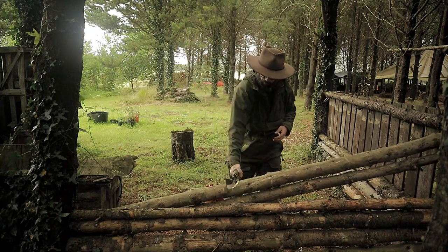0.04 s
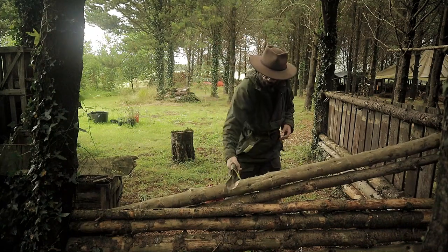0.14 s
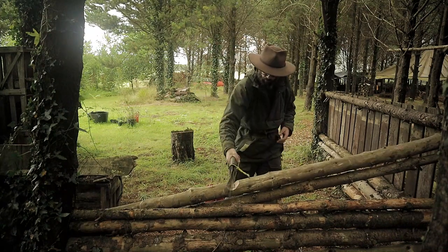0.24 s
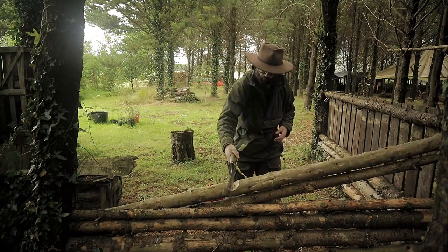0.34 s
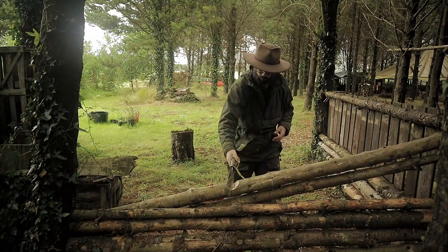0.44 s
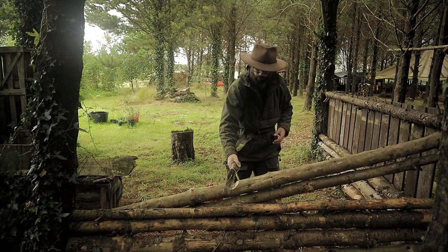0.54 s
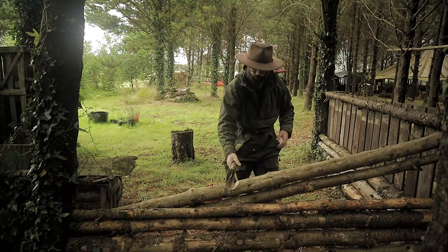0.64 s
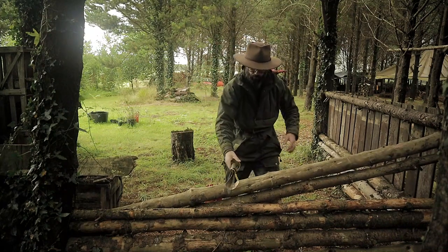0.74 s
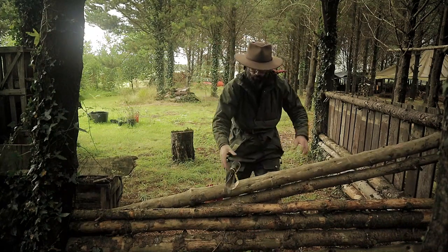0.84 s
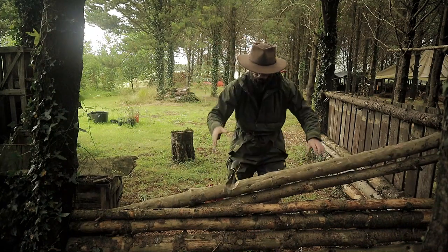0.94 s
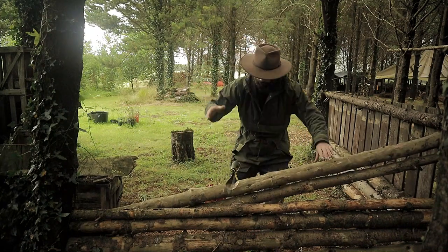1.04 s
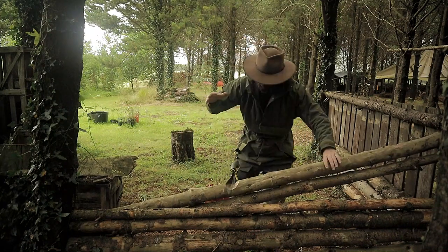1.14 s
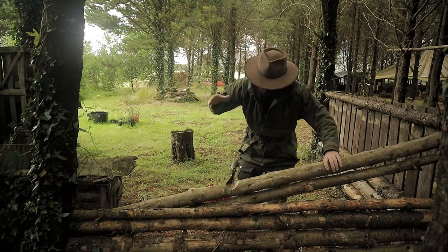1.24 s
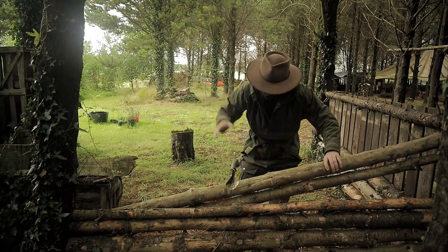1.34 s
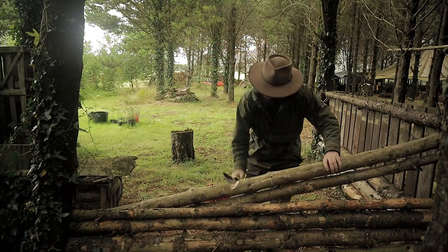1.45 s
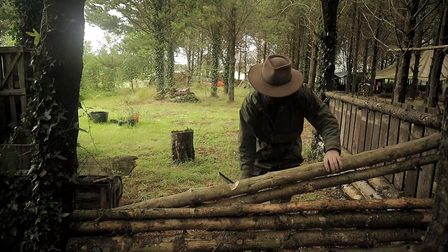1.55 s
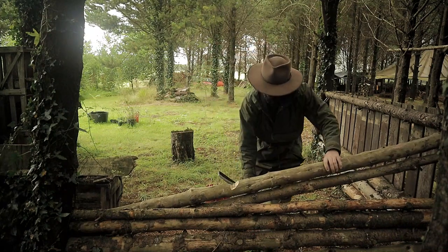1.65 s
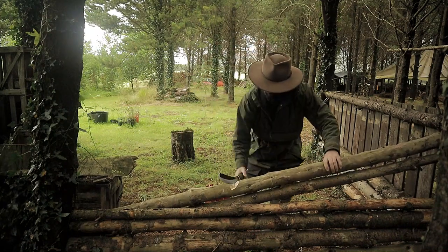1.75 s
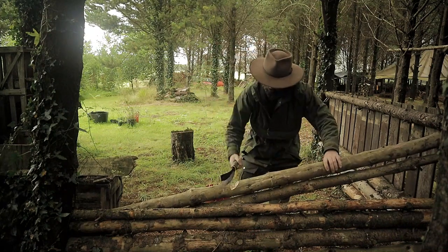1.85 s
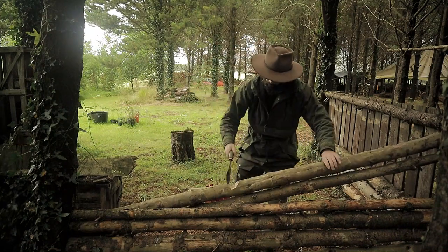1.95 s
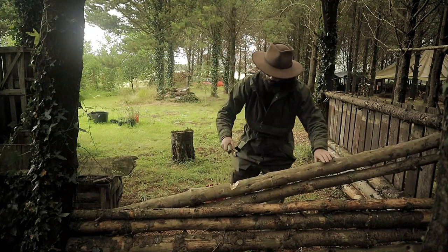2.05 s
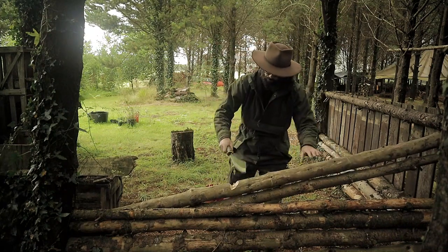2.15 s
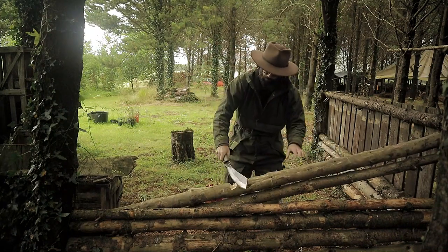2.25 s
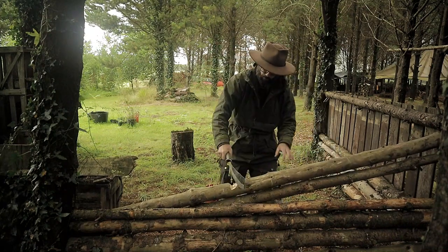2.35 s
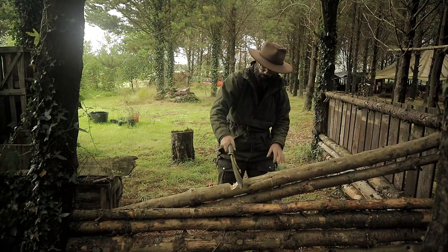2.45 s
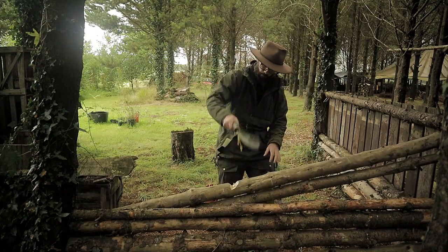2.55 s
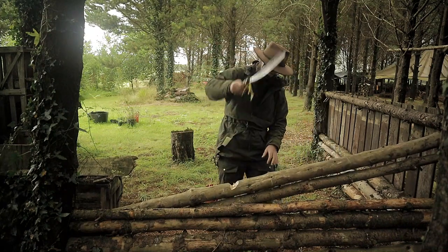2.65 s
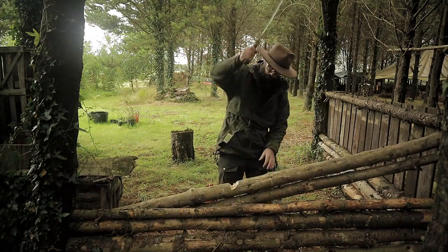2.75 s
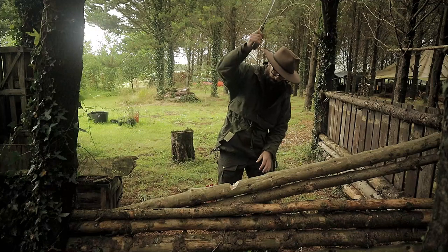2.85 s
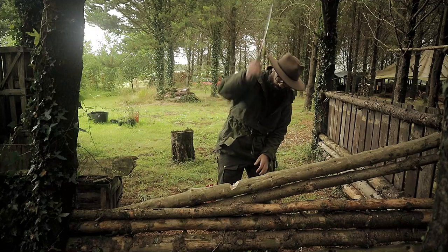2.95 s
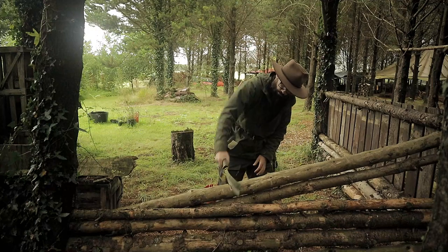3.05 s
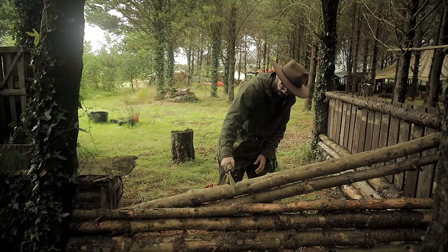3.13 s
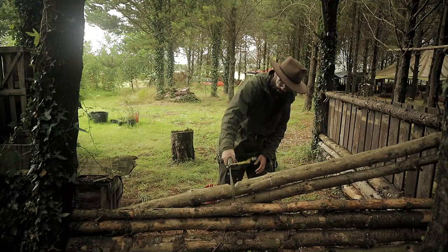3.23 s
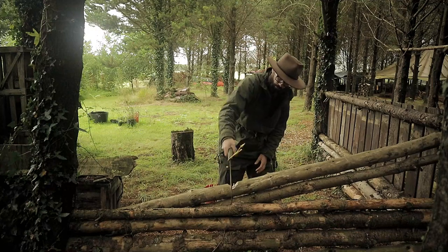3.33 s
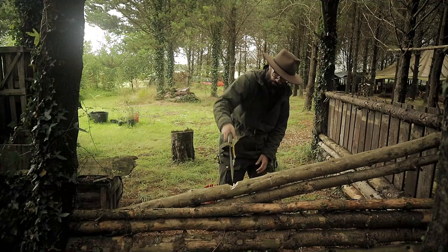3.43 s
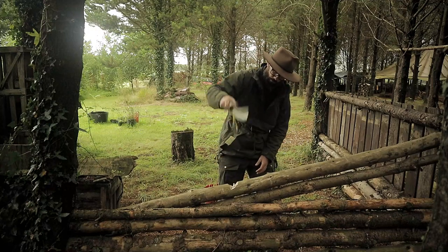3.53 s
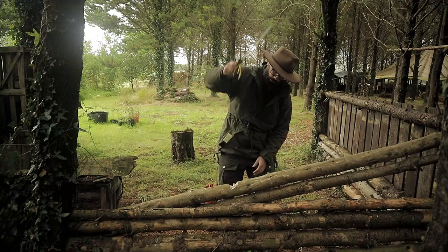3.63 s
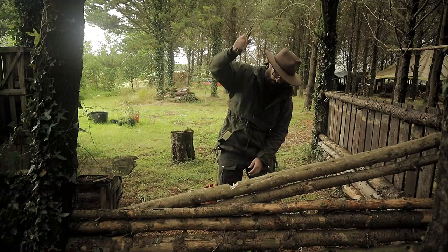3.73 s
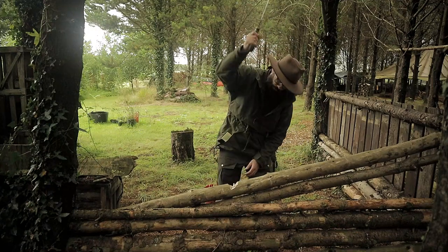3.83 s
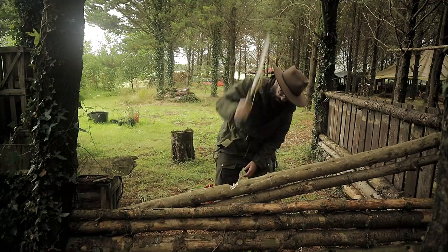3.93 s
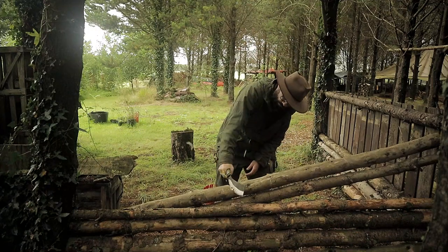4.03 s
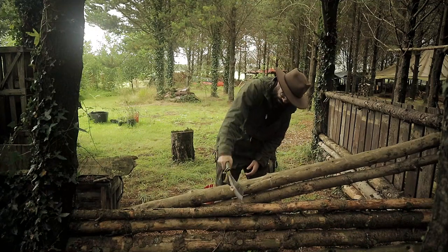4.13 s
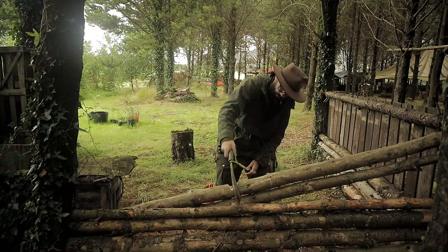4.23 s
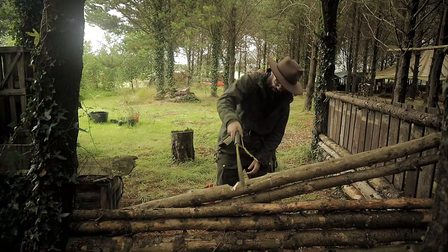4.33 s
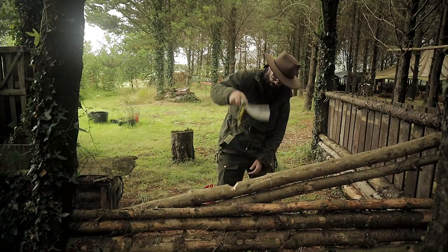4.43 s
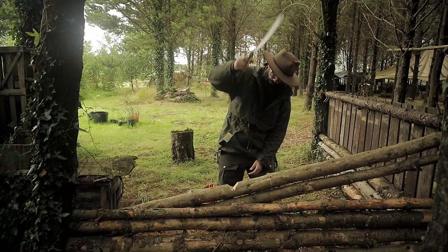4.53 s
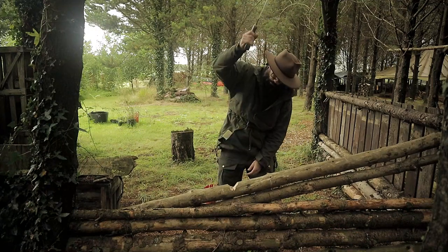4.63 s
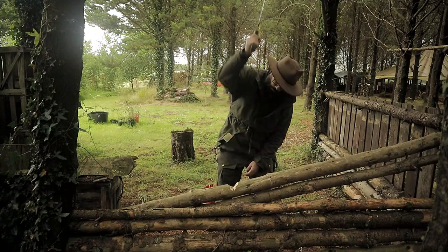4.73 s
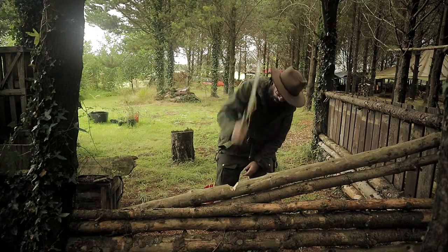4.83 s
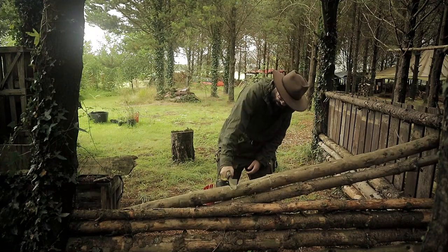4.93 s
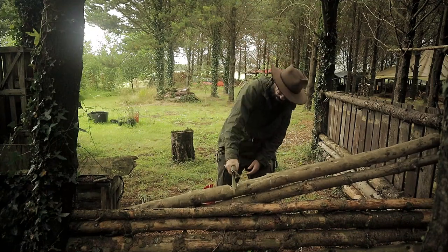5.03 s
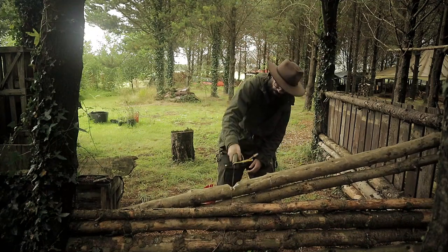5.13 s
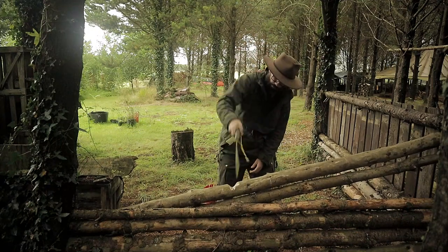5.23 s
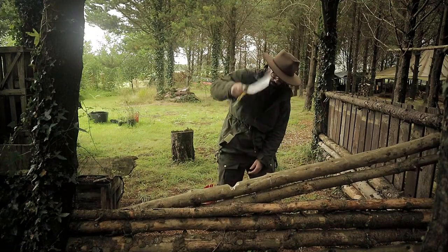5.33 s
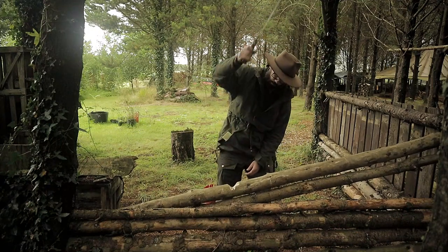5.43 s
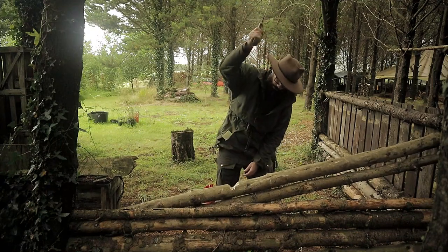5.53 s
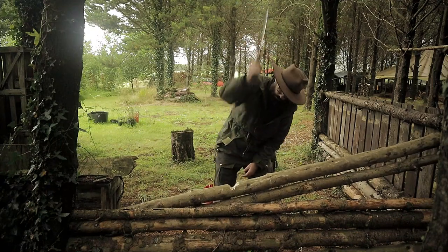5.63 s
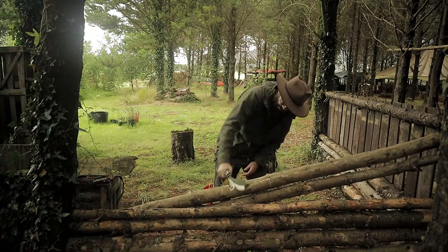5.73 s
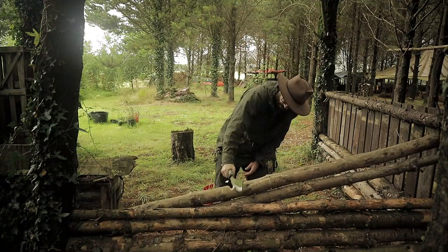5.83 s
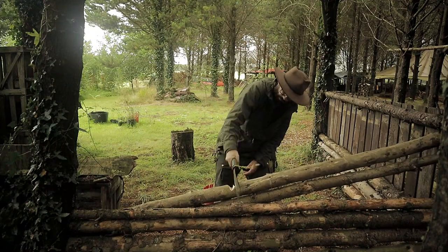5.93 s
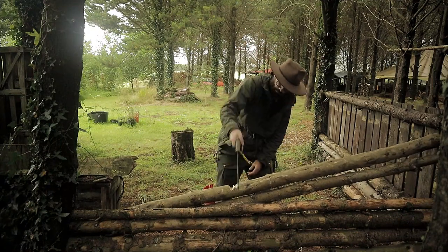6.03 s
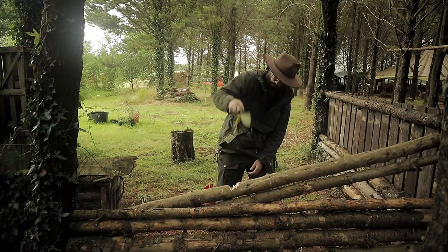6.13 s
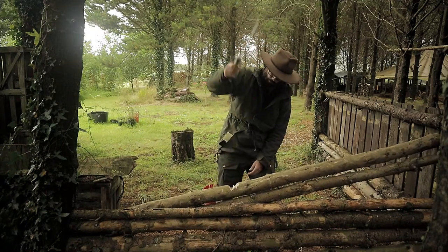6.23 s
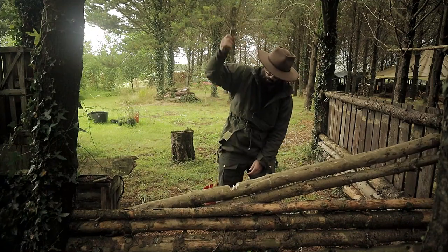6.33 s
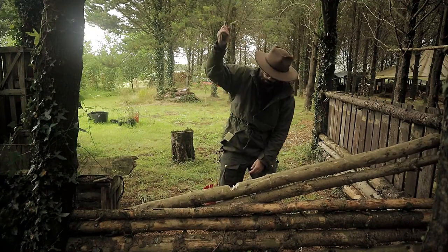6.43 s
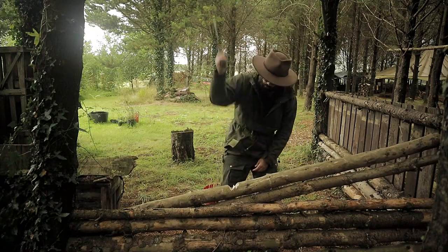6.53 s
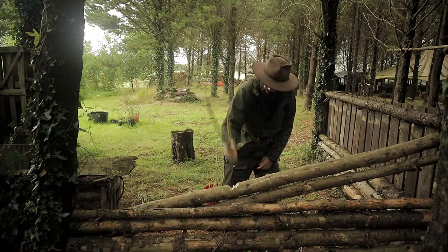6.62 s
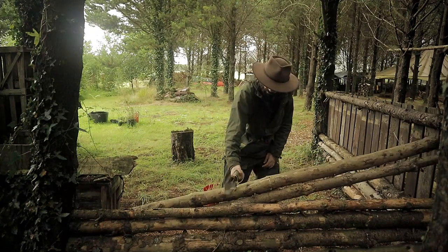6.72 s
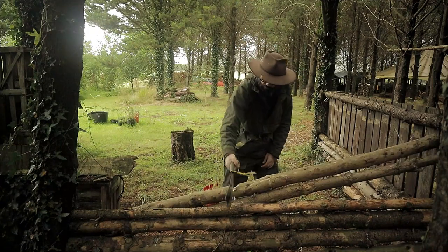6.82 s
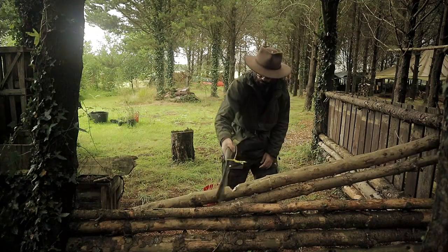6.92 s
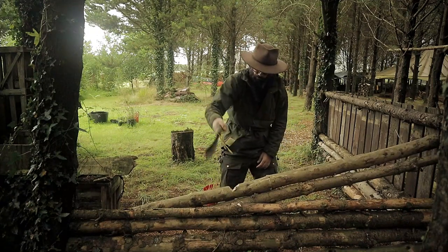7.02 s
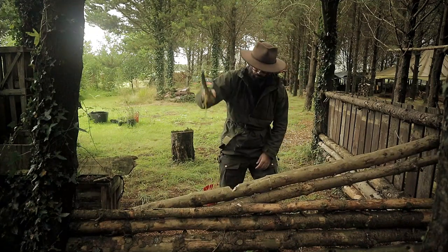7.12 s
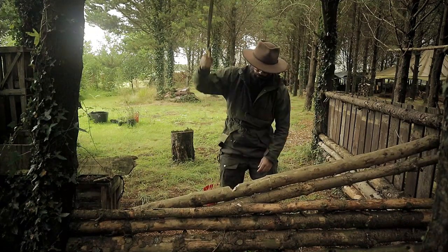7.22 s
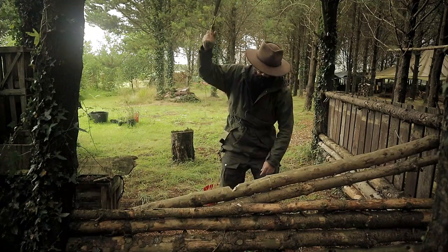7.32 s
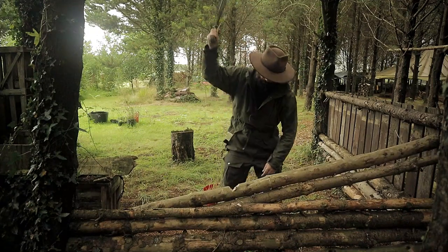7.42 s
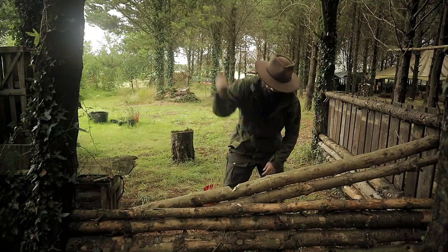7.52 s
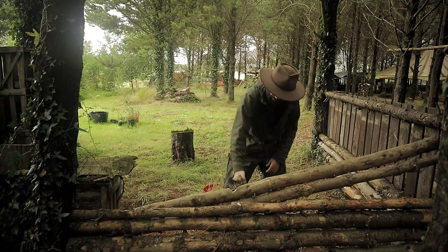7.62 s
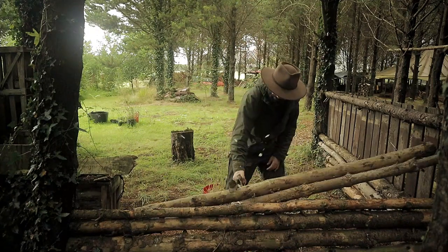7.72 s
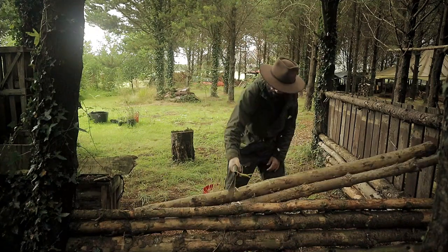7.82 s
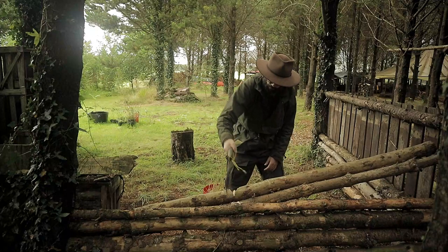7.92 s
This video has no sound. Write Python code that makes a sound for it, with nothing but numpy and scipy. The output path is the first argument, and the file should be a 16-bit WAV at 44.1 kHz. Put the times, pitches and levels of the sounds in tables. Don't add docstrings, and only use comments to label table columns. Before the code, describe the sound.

Outdoors among trees, hard single chops bite into a resonant pole, with falling chips, a brief blade scrape and faint birds between.

```python
import sys
import numpy as np
from scipy import signal
from scipy.fft import rfft, irfft
from scipy.io import wavfile
from scipy.ndimage import uniform_filter1d

SR = 44100
rng = np.random.default_rng(int(sys.argv[2]) if len(sys.argv) > 2 else 0)


def how_loud(loudness_db):
    steps = np.asarray(loudness_db, float) / 20
    return 10 ** steps


def unload_wav(signal):
    wavfile.write(
        sys.argv[1],
        SR,
        np.round(np.clip(np.atleast_2d(signal).T, -1, 1) * 32767).astype(np.int16),
    )


N = 351477

BLOW_S = [0.1154, 3.1507, 4.0930, 4.9755, 5.8300, 6.7497, 7.7052]
# fibre crackle in dB, crackle length in ms, blade ring in dB,
# time the edge sinks before the pole takes the load in ms, woody tail in dB.
BITES = [(-7, 1.3, -34.5, 0.017, 3), (-2.5, 1.1, -30, 0.37, -1), (-3, 2.3, -30.5, 1.7, -5.5),
         (2, 1.6, -19.5, 0.75, 0.5), (-3, 3.9, -18.5, 1.3, -11.5), (-10, 2.5, -33.5, .05, 4),
         (0, 0.79, -23.5, 0.33, 3)]
# frequency in Hz, level in dB, t60 in seconds.
POLE = [(165, -23, 0.36), (282, -27.5, 0.012), (338.3, -14, .14), (435, -16, 0.032), (450, -14.5, 0.14),
        (511, -17, 0.056), (489, -21.5, 0.34), (657, -14, 0.036), (708, -9.5, 0.12), (780, -17.5, 0.12),
        (840, -10.5, 0.06), (848, -13.5, 0.033), (972, -8, 0.1), (1075, -14.5, 0.067), (1208, -3.5, 0.044),
        (1454, -10.5, 0.022), (1830, -15, 0.025), (2126, -5.5, 0.024), (2560, -7.5, 0.019),
        (2886, -14.5, 0.019), (3600, -11, 0.017)]
# frequency in Hz, density in dB per Hz.
CRACKLE = [(710, -35), (1200, 4.5), (1760, -3), (4500, -1.5), (5250, -3.5), (6120, -18), (7210, -5),
           (9170, -9.5), (13700, -19), (16400, -31)]


def rms_one(x):
    return x / np.sqrt(np.mean(x ** 2) + 1e-20)


def at_hz(points, hz, column=1):
    points = np.array(points)
    return np.interp(np.log(hz), np.log(points[:, 0]), points[:, column])


def band(x, low_hz, high_hz, order=2):
    sos = signal.butter(order, [low_hz, min(high_hz, .45 * SR)], "band", fs=SR, output="sos")
    return signal.sosfilt(sos, x)


def colour(x, points):
    size = 4096
    hz = np.maximum(np.fft.rfftfreq(size, 1 / SR), 1)
    cepstrum = irfft(np.log(how_loud(at_hz(points, hz))))
    cepstrum[1:size // 2] *= 2
    cepstrum[size // 2 + 1:] = 0
    response = irfft(np.exp(rfft(cepstrum)))[:size // 2]
    return signal.fftconvolve(x, response / np.sqrt(np.sum(response ** 2)))[:len(x)]


def ring(force, hz, t60):
    radius = how_loud(-60 / (max(t60, .003) * SR))
    angle = 2 * np.pi * hz / SR
    return signal.lfilter([0, np.sin(angle)], [1, -2 * radius * np.cos(angle), radius ** 2], force + 1e-18)


def add(out, piece, s):
    i = round(s * SR)
    piece = piece[max(-i, 0):N - i]
    out[max(i, 0):max(i, 0) + len(piece)] += piece


def pole_ring(force, shares_db, damping):
    out = 0
    for k, (hz, level_db, t60) in enumerate(POLE):
        hz = hz * (1 + .011 * np.clip(rng.standard_normal(), -1.5, 1.5))
        late = np.roll(force, round(1.3 * SR / hz))
        gain = how_loud(level_db + shares_db[k])
        out = out + ring(late * gain * (-1) ** k, hz, t60 / damping)
    return out


def burst(length_ms, size):
    t = np.arange(size) / SR
    snaps = rng.standard_normal(size) * how_loud(2.2 * rng.standard_normal(size))
    decay = np.exp(-(t * 1000 / max(length_ms, .3)) ** 1.3)
    return rms_one(snaps) * np.minimum(t / 0.00018, 1) * decay


def blows():
    # pole level in dB, brightness in dB per octave,
    # side of the notch from -1 to 1, air push in dB.
    pole_blows = [(2, 2.5, -.55, 0.5), (1.5, 3, -0.075, 1), (0.4, -0.5, -0.56, -3.5), (1.5, 1.5, 1.0, -2),
                  (0, 2.5, 0.94, -6), (1, 2.5, -0.21, 0), (-1.23, 0, -.45, 1.5)]
    strike_hz = [300, 460, 720, 860, 970, 1210]
    # gain in dB near the lowest strike frequency, per blow.
    low_modes_db = [1.5, 1, -2.5, 1.5, -12.5, 2.5, 0]
    strikes = [(0.71, 9, 11, 4.5, -1.5), (-0.66, 2, -7.5, -0.5, 0.5), (-2.3, 0, 0.5, 0, -2),
               (2, 0.5, 2.5, -0.5, -3.5), (-1, 4, 3.5, 1.5, -8), (-1, -2, 0.5, -1, -0.5),
               (1.59, -1, 8.5, 0.5, -1)]
    # level in dB, frequency in Hz (the band lies 1.1 to 1.27 times higher), upper
    # modes in dB, damping of the wedged pole as a factor, steel left ringing in dB.
    splits = [(-13, 12000, 1.5, 1.1, -2.5), (-12.5, 6900, -3.5, 1.05, -4.5), (2, 7600, -6.5, 1.5, -4),
              (3, 8000, -0.5, 0.83, -7.5), (3.5, 7500, -2.5, 1.05, -3), (-8, 9300, -3.5, 1, -3),
              (1, 8100, -3, 1.1, -2.5)]
    # frequency in Hz, gain on the far side in dB.
    far_side = [(340, 1), (460, -8.5), (630, 2.5), (720, -3), (860, -6.5), (960, 5), (1200, -10.5),
                (1430, 2)]
    # frequency in Hz, level in dB, t60 in seconds.
    blade = [(4320, -1, 0.041), (5396, -3, 0.039), (5120, 3.5, 0.036)]
    out, size = np.zeros(N), SR // 2
    t, pole_hz = np.arange(size) / SR, np.array(POLE)[:, 0]
    contact = np.exp(-((t - .0004) / 0.000084) ** 2)
    for s, blow, bite, strike_db, low_db, cleft in zip(
            BLOW_S, pole_blows, BITES, strikes, low_modes_db, splits):
        pole_db, bright_db, side, push_db = blow
        crack_db, ms, blade_db, sink_ms, _ = bite
        split_db, split_hz, upper_db, damping, steel_db = cleft
        landing = np.transpose([[*strike_hz, 1450], [low_db, *strike_db, upper_db]])
        shares_db = pole_db + bright_db * np.log2(pole_hz / 1000) + side * at_hz(far_side, pole_hz)
        shares_db = shares_db + at_hz(landing, pole_hz)
        snaps = burst(ms, size)
        force = contact / contact.sum() + 0.11 * snaps
        push = np.sin(2 * np.pi * 450 * t) * np.exp(-(t / 0.0023) ** 2) * how_loud(push_db + 1.0)
        steel = 0
        for hz, level_db, t60 in blade:
            steel = steel + ring(snaps * .1 * how_loud(level_db + blade_db + steel_db), hz, t60)
        split = band(burst(ms * 0.37, size), split_hz * 1.1, split_hz / 0.79, order=1) * how_loud(split_db)
        add(out, how_loud(crack_db) * colour(snaps, CRACKLE) + split + steel, s)
        add(out, push + 0.48 * pole_ring(force, shares_db, damping), s + max(sink_ms, 0) / 1000)
    return out


def grain(size):
    drift = uniform_filter1d(uniform_filter1d(rng.standard_normal(size), size=150), size=150)
    return how_loud(1.6 * rms_one(drift) - 0.9)


def scatter(levels_db):
    echo_hz = [250, 600, 1200, 2600, 5300, 10000]
    # frequency in Hz, early over late part in dB, t60 in seconds.
    woods = [(200.4, 7.5, 0.31), (360, 6.5, 0.43), (700, 10, 0.33), (1248.6, 12.5, 0.52),
             (2500, 12.5, 0.51), (5000, 8.5, 0.23), (9000, 9, 0.49), (15000, 9, 0.35)]
    t = np.arange(SR * 3 // 4) / SR
    edges_hz = 140 * 2 ** np.arange(0, 7.1, .5)
    white, out = rng.standard_normal((2, len(t))), 0
    for k, (low, high) in enumerate(zip(edges_hz, edges_hz[1:])):
        hz = np.sqrt(low * high)
        t60 = max(at_hz(woods, hz, column=2), .05)
        early = how_loud(at_hz(woods, hz) - 60 * t / (t60 * 0.17))
        air_loss_db = 6.7 * max(np.log2(hz / 9000), 0)
        level = how_loud(at_hz(np.transpose([echo_hz, levels_db]), hz) - air_loss_db)
        patches = how_loud(1.5 * rms_one(uniform_filter1d(rng.standard_normal(len(t)), size=400)))
        far = how_loud(-9 - 9.8 * np.log2(hz / 1500) ** 2 - 60 * t / 1.35)
        out = out + rms_one(band(white[k % 2], low, high)) * patches * level * (how_loud(-60 * t / t60) + early + far)
    out = out * grain(len(t))
    return out * (1 - np.exp(-(t / .003) ** 2)) * np.cos(np.pi * t / 1.5)


def tails():
    tail_db = [-39, -34, -45.5, -47, -43, -53]
    # dB per dB of woody tail, at an echo band.
    follows_wood = [-0.91, 0.96, 0.46, -0.024, -0.68, -0.47]
    # dB per dB of blade ring, at an echo band.
    follows_blade = [0.12, 0.01, 0.01, 0.26, 0.72, .48]
    # start in seconds, centre in Hz, width in Hz, level in dB, t60 in seconds.
    blooms = [(0.117, 1290, 491, -37.5, 0.56), (.116, 468, 30.55, -45, 0.71),
              (3.151, 380, 30.16, -46.5, 0.86), (7.705, 466, 28, -42, 0.67), (.116, 2683, 607, -46.5, 0.75),
              (3.15, 1300, 486, -44.5, 0.24), (4.095, 5730, 600, -46, 0.5), (4.093, 7350, 700, -50, 0.5),
              (4.095, 2260, 403, -45, 0.37), (4.095, 3850, 400, -54, 0.4), (4.095, 1000, 597, -52, 0.89),
              (4.975, 3200, 2997, -53.5, 0.83), (4.977, 4000, 600, -45.5, .7),
              (4.977, 6950, 700, -54, 0.81), (4.977, 5400, 1200, -47, 0.59), (4.977, 1800, 300, -52, .6),
              (4.977, 700, 347.6, -37.5, 0.32), (4.977, 8700, 2000, -50, 0.49),
              (3.152, 2960, 406.4, -50, 0.58), (3.152, 1930, 296.7, -54, 0.43),
              (5.832, 5650, 500, -41.5, 0.52), (5.833, 5100, 500, -42, 0.55),
              (5.832, 8460, 2500, -50.5, 0.36), (5.832, 653.5, 350, -40.5, .25),
              (5.832, 95.75, 50.2, -41.5, 0.43), (6.76, 4250, 770, -53.5, .7),
              (6.76, 6300, 1400, -55.5, 0.72), (.117, 5600, 4400, -52, .5), (3.152, 5100, 4000, -52, 0.55),
              (6.76, 2275, 460, -55, 0.63), (7.706, 2300, 540, -48, 0.41),
              (7.706, 10000, 4000, -56.5, 0.74), (7.705, 6300, 900, -54.5, 0.71),
              (4.099, 160, 60, -38.5, 0.31), (3.151, 718.6, 118.5, -43.5, 0.43),
              (.116, 714, 152.4, -46, 0.78), (4.974, 1020, 122.2, -36, 0.26),
              (5.832, 980, 119.7, -42.5, 0.38), (6.75, 1137, 496, -40.5, 0.91),
              (7.704, 4160, 1500, -51, 0.94)]
    out, t = np.zeros(N), np.arange(SR * 3 // 4) / SR
    for s, (_, _, blade_db, _, wood_db) in zip(BLOW_S, BITES):
        levels_db = np.array(tail_db) + wood_db * np.array(follows_wood)
        levels_db = levels_db + (blade_db + 23) * np.array(follows_blade)
        add(out, scatter(levels_db), s)
    for s, hz, width_hz, db, t60 in blooms:
        bloom = rms_one(band(rng.standard_normal(len(t)), hz - width_hz / 2, hz + width_hz / 2))
        decay = how_loud(db - 60 * t / max(t60, .1)) * np.minimum(t / 0.0054, 1)
        add(out, bloom * grain(len(t)) * decay, s)
    return out


def swishes():
    # centre in Hz, level in dB.
    swish_bands = [(700, -64.5), (696, -68), (430, -62.5), (900, -65.5), (800, -66), (895, -67.5),
                   (690, -65)]
    out, t = np.zeros(N), np.arange(SR // 2) / SR
    for s, (hz, db) in zip(BLOW_S, swish_bands):
        air = rms_one(band(rng.standard_normal(len(t)), hz * .5, hz * 2))
        swell = 2.6 * np.exp(-(t[::-1] / .06) ** 1.5)
        add(out, how_loud(db) * air * swell, s - len(t) / SR)
    return out


def shakes():
    # start in seconds, loose logs in dB, ground thud in dB, slow sway in dB, stand ring in dB.
    pile_shakes = [
        (0.118, -40, -39.5, -55, -49),
        (0.549, -80, -51.5, -77, -60),
        (1.529, -65, -37.5, -63, -58),
        (2.32, -60, -54.5, -67.5, -65.5),
        (3.149, -35, -47.5, -55.5, -54),
        (4.093, -33.5, -38.5, -57, -51),
        (4.9766, -27.5, -41, -60, -54),
        (5.83, -30, -38, -61, -55),
        (6.7498, -26.5, -41, -66.5, -62),
        (7.705, -30.5, -41, -66.5, -60),
    ]
    sway_hz, sway_peak_s, stand_hz = 37.6, .38, 64.9
    out, t = np.zeros(N), np.arange(SR * 3 // 2) / SR
    for s, logs_db, thud_db, sway_db, stand_db in pile_shakes:
        knock = rms_one(band(rng.standard_normal(len(t)), 49, 190))
        knock = how_loud(logs_db) * knock * (1 - np.exp(-t / 0.0033)) * np.exp(-t / .075)
        thud = rms_one(band(rng.standard_normal(len(t)), 28, 140))
        thud = thud * np.minimum(t / 0.051, 1) * how_loud(thud_db - 60 * t / 0.65)
        swell = (t / sway_peak_s * np.exp(1 - t / sway_peak_s)) ** 2
        sway = how_loud(sway_db) * swell * np.sin(2 * np.pi * sway_hz * t)
        stand = how_loud(stand_db + 3 - 60 * t / 2.2) * np.minimum(t / .08, 1) * np.sin(2 * np.pi * stand_hz * t)
        add(out, (knock + thud + sway + stand) * np.cos(np.pi * t / 3), s)
    return out


def light_contacts():
    # start in seconds, peak in dB, centre in Hz.
    chip_falls = [(0.564, -50.5, 2865), (0.6303, -51, 4600), (0.6477, -55, 2800), (0.9544, -51, 1857),
                  (3.27, -39, 2990), (3.598, -39.5, 2080), (4.4292, -51, 2940), (4.4546, -48.5, 1797),
                  (4.5065, -52, 3470), (4.5048, -50.5, 8340), (4.874, -56, 5000), (5.069, -45, 2100),
                  (5.229, -52.5, 2500), (4.6138, -43, 2800), (4.6485, -54, 4883), (4.6658, -45.5, 4730),
                  (5.4165, -44.5, 2530), (5.5314, -42.5, 1980), (5.5522, -52, 3920), (6.0906, -52.5, 2560),
                  (6.1495, -59.5, 4396), (6.2957, -57, 3110), (6.4757, -55.5, 2400), (6.5954, -48.5, 2100),
                  (6.6937, -46, 1100), (6.796, -45, 2270), (7.1961, -57, 4700), (7.2144, -52.5, 4680),
                  (7.257, -49, 4700), (7.2664, -47, 4796), (7.5611, -52, 2570), (7.799, -49, 13000),
                  (7.877, -58, 11000), (7.893, -56.5, 11050)]
    # start in seconds, peak in dB, centre in Hz, share into the pole in dB.
    knock_backs = [(0.1916, -34.5, 2550, 4), (0.2118, -30, 1800, 4), (0.4687, -52.5, 3600, 6),
                   (3.2264, -36, 2106, 1), (5.0223, -22.5, 1900, 8), (6.8218, -31, 2274, -2),
                   (7.2492, -46.5, 3600, 4), (7.7607, -25.5, 2900, 8), (7.78, -36.5, 5000, 4.5),
                   (7.786, -28.5, 2300, 8.5)]
    # start in seconds, peak in dB, centre in Hz,
    # length in ms, share into the pole in dB.
    blade_taps = [(1.4945, -39.5, 1290, 4.5, 3.5), (1.503, -39, 4450, 4.4, 10),
                  (1.514, -48, 6020, 4.9, -16), (1.523, -42, 3000, 9.9, -15), (1.528, -27, 7750, 6.3, 4),
                  (1.532, -18, 3250, 4.6, -17), (1.545, -43, 3000, 13, -16), (1.5903, -45, 4000, 4.7, -11),
                  (1.599, -48, 6010, 5.3, -15), (1.61, -45, 1000, 14, 4), (1.642, -39.5, 1110, 1.6, 5),
                  (1.661, -52, 4004, 1.7, 3), (2.312, -37, 4300, 5.1, 8), (2.315, -70, 7600, 2.8, 7),
                  (2.320, -31, 1850, 0.74, 4)]
    # frequency in Hz, gain in dB.
    hand = [(300, 6), (460, -5.5), (700, 0), (950, 0.5), (1220, -3)]
    out, size, chip_ms = np.zeros(N), SR // 5, 2.8
    chips = [(s, db, hz, chip_ms, -9) for s, db, hz in chip_falls]
    knocks = [(s, db, hz, chip_ms, pole_db) for s, db, hz, pole_db in knock_backs]
    hand_db = at_hz(hand, np.array(POLE)[:, 0])
    for s, db, hz, ms, pole_db in chips + knocks + [*blade_taps]:
        snaps = burst(ms, size)
        tick = 1.3 * band(snaps, hz * .72, hz / .72)
        wood = pole_ring(snaps / np.sqrt(ms * 44), min(pole_db, 4) + hand_db, damping=1.9)
        fade = np.hanning(2 * size)[size:]
        add(out, how_loud(db) * (tick + 0.31 * colour(snaps, CRACKLE) + wood) * fade, s)
    return out


def creaks():
    # start in seconds, length in seconds, slips per second, level in dB.
    creak_times = [
        (5.268, .064, 212, -46),
    ]
    # frequency in Hz, level in dB, t60 in seconds.
    creak_body = [(226.4, 1.5, 0.0306), (430, -2, 0.028), (620, -1, 0.011), (1000, -9, 0.014)]
    out = np.zeros(N)
    for s, length, rate, db in creak_times:
        at = np.arange(0, length, 1 / rate)
        slips = np.zeros(SR // 5)
        time_jitter, level_jitter = rng.standard_normal((2, 40))[:, :len(at)]
        slip_db = db + 4.6 * (at / length - 2.5) - 3 * (np.arange(len(at)) % 2) + 1.5 * level_jitter
        slips[((at + .002 + .0003 * time_jitter) * SR).astype(int)] = how_loud(slip_db)
        add(out, sum(how_loud(level_db) * ring(slips, hz, t60) for hz, level_db, t60 in creak_body), s)
    return out


def drag():
    # time in seconds, pressure in dB.
    pressure = [
        (1.494, -50),
        (1.498, -39),
        (1.524, -54),
        (1.538, -36),
        (1.56, -53),
        (1.59, -75),
        (1.62, -43),
        (1.65, -88),
        (1.69, -83),
    ]
    s, pressure_db = np.transpose(pressure)
    t = np.arange(s[0], s[-1], 1 / SR)
    grains = rng.standard_normal(len(t)) * how_loud(1.3 * rng.standard_normal(len(t)))
    speed = 0.072 + np.exp(-((t - 1.55) / 0.045) ** 2)
    rasp = rms_one(band(grains, 527, 1550)) + rms_one(band(grains, 3000, 9410)) * how_loud(-8.5) * speed
    out = np.zeros(N)
    add(out, rasp * how_loud(np.interp(t, s, pressure_db)), s[0])
    return out


def light_tap():
    # frequency in Hz, level in dB, t60 in seconds.
    free_blade = [(988, -34.5, 0.049), (1800, -28.5, .022), (4300, -33, 0.018), (1480, -36, 0.038),
                  (6100, -66, 0.026), (7600, -45, 0.035)]
    out, snaps = np.zeros(N), burst(1.6, SR // 5) * 0.13
    add(out, sum(ring(snaps * how_loud(db), hz, t60) for hz, db, t60 in free_blade), 2.3105)
    return out


def bumps():
    # start in seconds, peak in dB, frequency in Hz, t60 in seconds.
    dull_bumps = [(0.48, -73.5, 81.1, 0.16), (0.603, -46, 72, 0.15), (0.658, -53.5, 72, 0.16),
                  (1.498, -39, 313, 0.12), (1.558, -39, 132.1, 0.86), (1.617, -45, 129.2, 0.57),
                  (1.645, -28, 163, 0.053), (1.676, -36, 127.6, 0.12), (2.21, -65, 80, 0.13),
                  (2.309, -37.5, 310, 0.15), (2.31, -38, 393, 0.063), (2.309, -34.5, 540, .06),
                  (.62, -48.5, 165, 0.079), (2.339, -44, 135, 0.17), (2.42, -52, 71.6, 0.11),
                  (5.297, -50, 110, 0.1), (5.33, -54, 108.5, 0.093), (6.359, -56, 377.5, 0.14),
                  (7.25, -54, 383, 0.16)]
    out, t = np.zeros(N), np.arange(SR // 2) / SR
    push = np.exp(-((t - .004) / 0.00052) ** 2)
    for s, db, hz, t60 in dull_bumps:
        modes = ring(push, hz, t60) + 0.33 * ring(push, hz * 1.49, t60 * 0.65)
        add(out, how_loud(db) * modes / push.sum(), s)
    return out


def whistle(pitch_hz, db):
    flutter = rms_one(uniform_filter1d(rng.standard_normal(len(pitch_hz)), size=120))
    fade = np.hanning(len(pitch_hz)) ** 0.28 * how_loud(6.8 * np.roll(flutter, len(flutter) // 2))
    phase = 2 * np.pi * np.cumsum(pitch_hz * (1 + 0.017 * flutter)) / SR
    return how_loud(db + 2.0) * fade * np.sin(phase)


def birds():
    # start in seconds, length in seconds, first pitch in Hz, last pitch in Hz, level in dB.
    far_birds = [(0.51, 0.047, 4150, 4135, -74), (4.345, 0.041, 4190, 3510, -77),
                 (4.405, 0.036, 3900, 4127, -76), (4.44, 0.059, 4200, 4030, -78),
                 (4.525, .03, 4300, 3920, -78), (4.56, 0.049, 4050, 4030, -79),
                 (4.593, 0.019, 3500, 3580, -74), (5.196, 0.049, 7600, 7310, -82),
                 (5.366, 0.077, 7600, 7500, -73.5), (5.615, 0.054, 3964, 3800, -74),
                 (5.661, 0.06, 3900, 3553, -70), (5.72, .07, 3800, 3850, -70),
                 (6.09, 0.11, 8240, 8070, -83), (7.043, 0.041, 2740, 2823, -67.5),
                 (7.06, 0.036, 3390, 3520, -74), (7.092, 0.039, 4090, 4080, -65.5),
                 (7.14, .1, 4086, 4070, -77), (7.17, 0.13, 2100, 2266, -72)]
    # start in seconds, length in seconds, top pitch in Hz, level in dB.
    warble = [(6.227, .035, 7870, -75.5), (6.263, .04, 7840, -72.5), (6.322, .035, 8880, -75.5),
              (6.352, 0.046, 7820, -71.5), (6.399, 0.051, 7850, -83.5), (6.464, 0.043, 8660, -77.5),
              (6.499, 0.041, 7960, -74), (6.548, .04, 7990, -77.5), (6.592, 0.032, 8120, -81),
              (6.632, 0.046, 8800, -81), (6.692, .04, 8030, -82)]
    out = np.zeros(N)
    for s, length, first_hz, last_hz, db in far_birds:
        add(out, whistle(np.linspace(first_hz, last_hz, round(length * SR)), db), s)
    for s, length, top_hz, db in warble:
        dip = np.interp(np.linspace(0, 1, round(length * SR)), [0, .55, 1], [0, 1, 1 - .75])
        add(out, whistle(top_hz * (1 - .1 * uniform_filter1d(dip, size=200)), db), s)
    return out


def background():
    # frequency in Hz, density in dB per Hz.
    pine_air = [(35, -33.5), (60, -5.5), (140, -7.5), (793, -11), (2450, -21), (4610, -22), (6110, -29),
                (8890, -27.5), (14900, -33), (16400, -38.5)]
    # time in seconds, wind level in dB.
    gusts = [(0, -65), (.9, -66.5), (1.3, -67), (2.1, -66.5), (2.8, -66), (3.8, -65.5), (4.7, -64.5),
             (5.6, -65), (6.4, -66), (7.3, -63), (7.97, -70)]
    gust_s, gust_db = np.transpose(gusts)
    air = colour(rng.standard_normal(N + SR // 10), pine_air)[SR // 10:]
    air = air / np.std(band(air, 340, 5800)) * how_loud(np.interp(np.arange(N) / SR, gust_s, gust_db))
    rumble = rms_one(band(rng.standard_normal(N + SR), 28, 76)[SR:])
    return air + rumble * how_loud(-75.5)


def scene():
    chops, calls = blows(), birds()
    small = light_contacts() + creaks() + drag() + light_tap()
    sent = how_loud(-12.5) * chops + small + how_loud(10.0) * calls
    echo = signal.fftconvolve(sent, scatter([-72, -61, -67.5, -65.0, -59.0, -61.5]))[:N]
    direct = chops + small + calls + swishes() + shakes() + bumps()
    return (direct + tails() + echo + background())[None]


def roll_off(x):
    return signal.sosfilt(signal.butter(12, 16510, fs=SR, output="sos"), x)


def record(dry):
    cut = signal.sosfilt(signal.cheby2(6, 40, 16900, fs=SR, output="sos"), dry)
    return roll_off(np.clip(cut, -.99, .99))


dry = scene()
out = record(dry)
unload_wav(out)
```